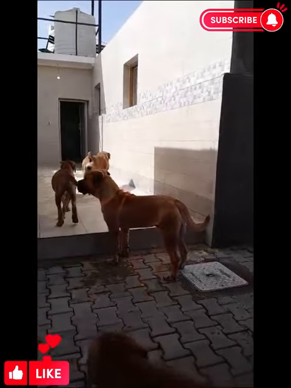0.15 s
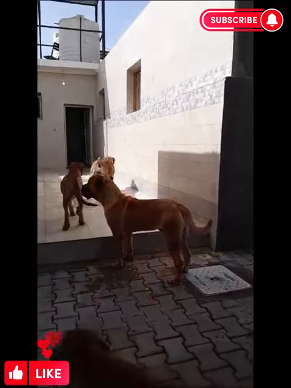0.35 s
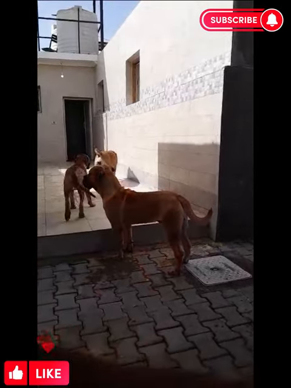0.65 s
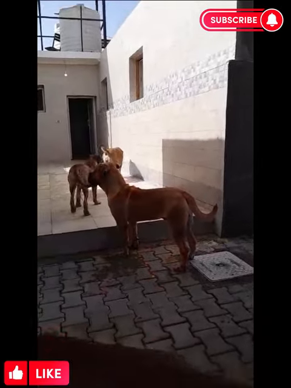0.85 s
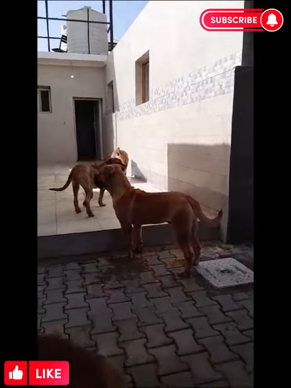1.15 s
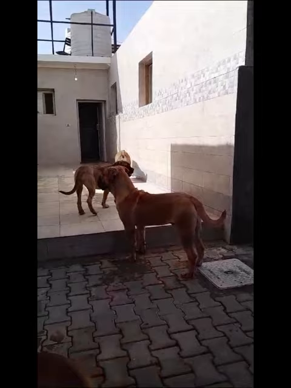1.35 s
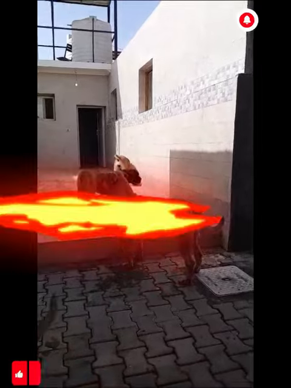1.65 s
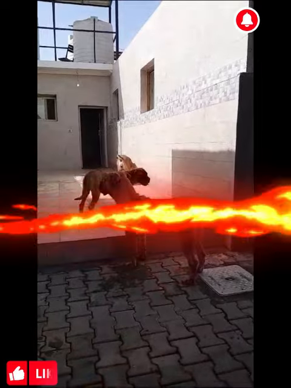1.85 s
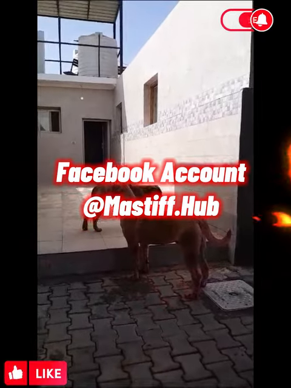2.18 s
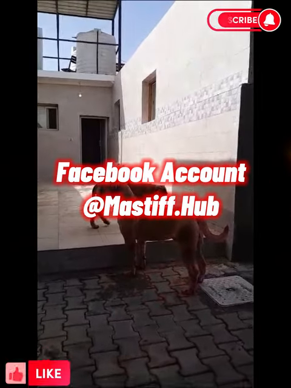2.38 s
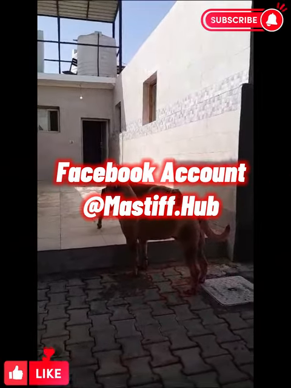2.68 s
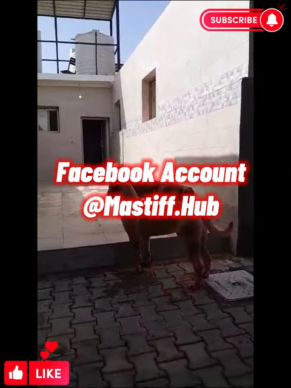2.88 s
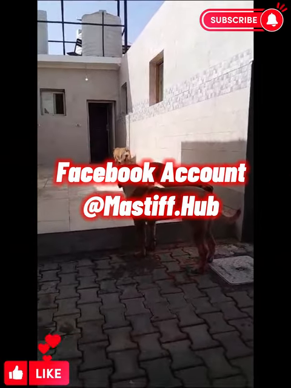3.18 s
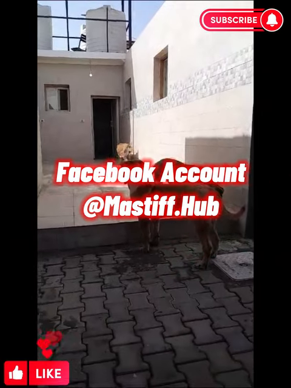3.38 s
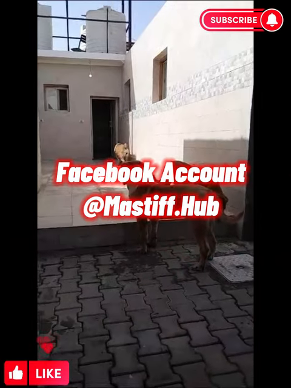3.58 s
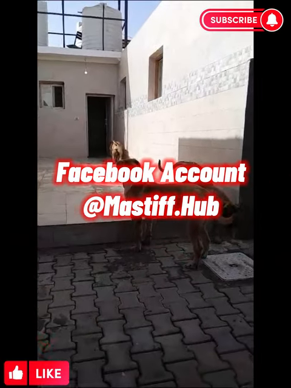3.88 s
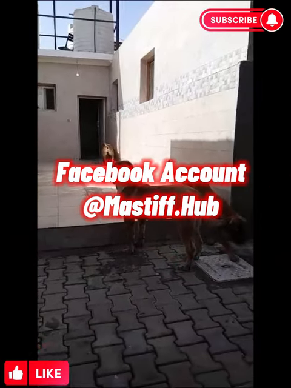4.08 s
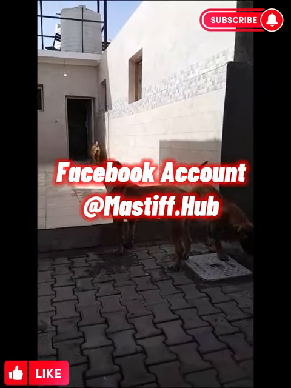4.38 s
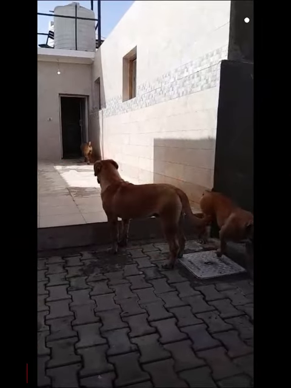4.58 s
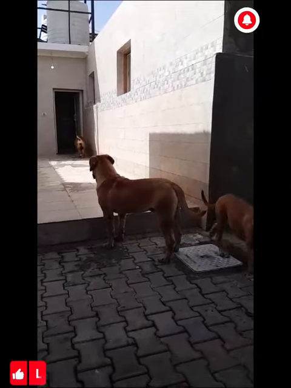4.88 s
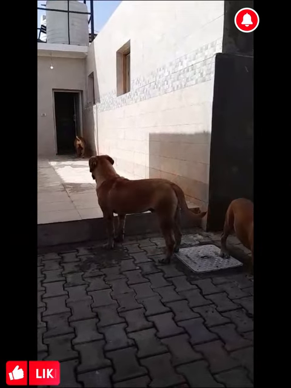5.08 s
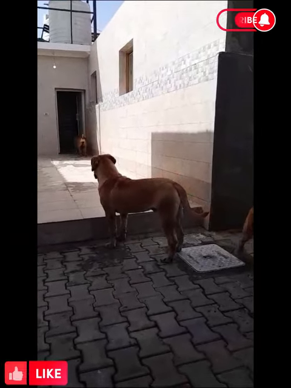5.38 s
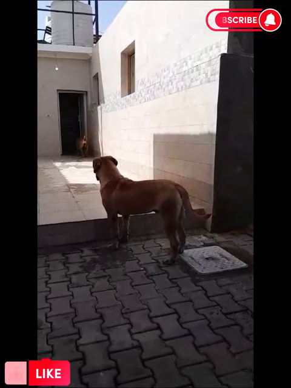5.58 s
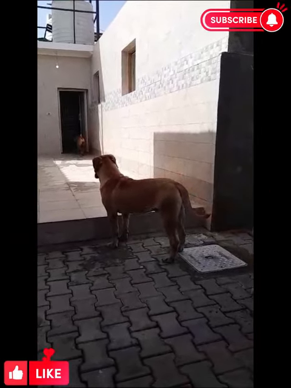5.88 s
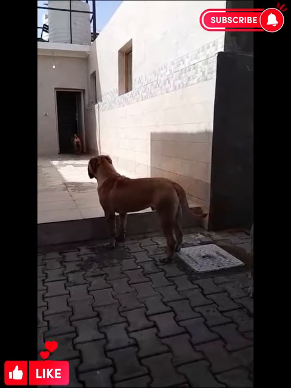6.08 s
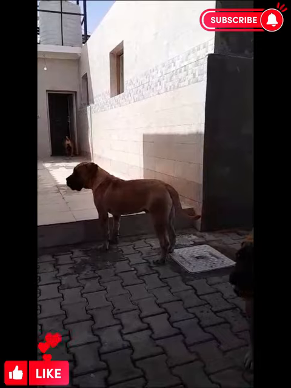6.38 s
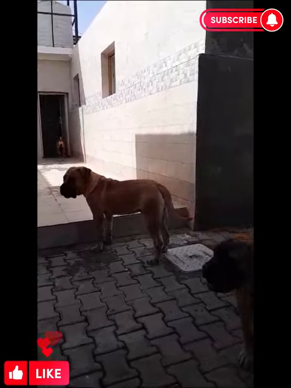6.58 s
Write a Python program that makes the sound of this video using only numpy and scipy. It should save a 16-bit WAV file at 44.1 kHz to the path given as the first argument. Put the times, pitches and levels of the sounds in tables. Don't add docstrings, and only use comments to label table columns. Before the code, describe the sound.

In a paved, walled courtyard, wind bumps low on a handheld phone while paws scuff lightly. A big dog close by gives a deep rough bark, then a weaker one; a distant dog answers twice, higher and reverberant. Fast sniffing grows near the microphone, then the close dog barks loudest, followed by a quick second bark overlapped by the far dog. Walls echo, and faint town hush lingers.

```python
import sys
import numpy as np
from scipy import signal
from scipy.fft import rfft, irfft, next_fast_len
from scipy.io import wavfile
from scipy.ndimage import uniform_filter1d

SR = 44100
rng = np.random.default_rng(int(sys.argv[2]) if len(sys.argv) > 2 else 0)


def log_audio(samples):
    frames = np.atleast_2d(samples).T
    limited = np.clip(frames, -1, 1)
    pcm = np.round(limited * 32767).astype(np.int16)
    wavfile.write(sys.argv[1], SR, pcm)


def level_to_linear(level):
    exponent = np.asarray(level, float) / 20
    return 10 ** exponent


N = 297224

# (peak [s], rise [s], fall [s], peak level [dB], top pitch [Hz])
NEAR_BARKS = [
    (1.727, 0.074, .11, -11.5, 226.9),
    (2.672, 0.09, 0.1, -26, 202.3),
    (5.54, 0.089, .11, -10, 212.6),
    (6.167, .085, .07, -15, 228.8),
    (6.8, 0.09, 0.071, -32, 180),
]
FAR_BARKS = [
    (2.955, .11, 0.12, -19, 321.1),
    (3.697, .105, .13, -22.5, 288.6),
    (6.29, .07, 0.1214, -19, 287.6),
]


def evened(x):
    return x / np.sqrt(np.mean(x ** 2) + 1e-20)


def read(points, hz):
    f, value = np.transpose(points)
    return np.interp(np.log(hz + 1), np.log(f + 1), value)


def add(mix, s, sound):
    part = mix[..., max(round(s * SR), 0):][..., :sound.shape[-1]]
    part += sound[..., :part.shape[-1]]


def drift(count, hz):
    lowpass = signal.butter(2, hz, fs=SR, output="sos")
    return evened(signal.sosfilt(lowpass, rng.standard_normal(count + 4000))[4000:])


def swell(t, s, half):
    return np.exp(-((t - s) / max(half, .002)) ** 2)


def resonate(x, hz, width):
    turn = np.exp(2j * np.pi * np.cumsum(hz * np.ones(x.shape[-1])) / SR)
    r = np.exp(-np.pi * width / SR)
    return 2 * (turn * signal.lfilter([(1 - r) ** 2], [1, -2 * r, r * r], x / turn)).real


def coloured(x, points):
    size = next_fast_len(x.shape[-1])
    gain = level_to_linear(read(points, np.fft.rfftfreq(size, 1 / SR)))
    return irfft(rfft(x, size) * gain, size)[..., :x.shape[-1]]


def sides(db):
    return level_to_linear(np.array([db / 2, -db / 2]))


def perform(row, flutter, vowel, jaw, gesture, rough, full_db):
    peak, rise, fall, db, hz = row
    rasp_db, bright_db, chest_db = flutter
    mouth_ratio, *throat_db = vowel
    stretch_start, stretch_end, fade_db, tilt_db, arch = jaw
    stage, effort_db, ratio, rougher, mouth_hz, more_rasp_db, more_chest_db = np.transpose(gesture)
    rough_per_db = .03
    rows = np.transpose([
        peak + stage * np.where(stage < 0, rise, fall),
        db + effort_db,
        hz * ratio ** arch,
        rough + rougher + rough_per_db * max(full_db - db, 0),
        mouth_hz * mouth_ratio,
        rasp_db + more_rasp_db,
        chest_db + more_chest_db])
    return rows, (stretch_start, stretch_end, bright_db, fade_db, tilt_db, [*throat_db, 0])


def bark(rows, colour, throat, cavities, chest_hz, jitter, weak_db):
    # (time [s], level [dB], half length [s])
    surges = [(1.673, -4, .008), (1.681, 4.5, 0.0043), (1.699, 2.5, 0.0044), (1.723, 4.5, 0.0044),
              (1.737, 3.8, 0.007), (1.762, 6.5, .008), (2.605, -5, 0.0074), (2.61, 6, 0.0062),
              (2.648, 6, 0.0068), (2.704, 0.5, 0.0023), (2.882, -9.5, 0.014), (2.892, 2.5, 0.0057),
              (2.906, 1.5, 0.006), (2.941, 5.5, 0.0098), (2.956, -6, 0.002), (2.986, 2.5, 0.0041),
              (3, 12.5, 0.0094), (3.639, 10, 0.0062), (3.641, -10.5, .004), (3.655, 10, 0.0074),
              (3.663, -9.5, 0.0025), (3.684, 14.5, 0.0041), (3.696, 5, 0.0031), (3.703, 9, 0.0027),
              (3.731, 9, .008), (3.788, 7, 0.017), (5.456, -17, .008), (5.487, -7, 0.012),
              (5.497, 3, 0.0072), (5.528, 3.5, 0.015), (5.535, 2.5, 0.0052), (5.559, -2, 0.0067),
              (6.114, 5, 0.0069), (6.127, -8, 0.014), (6.14, 7.5, 0.0054), (6.154, 2.5, 0.018),
              (6.229, -3, 0.0069), (6.27, 3.5, 0.0034), (6.283, -8, 0.0056), (6.29, 1, 0.0052),
              (6.319, -10.5, 0.0062), (6.33, 9, .008), (6.374, -5, 0.004)]
    # (time [s], half length [s], centre [Hz], width [Hz], level re voice [dB])
    flares = [(1.685, 0.0066, 2202, 300, -15.5), (1.696, 0.015, 4696, 298, -30),
              (1.72, 0.014, 5280, 600, -33.5), (1.744, .028, 2600, 200, -15.5),
              (1.746, .03, 2210, 200, -14.5), (2.626, 0.017, 2300, 250, -14.5),
              (2.697, 0.015, 3020, 606, -10.5), (2.705, .035, 5520, 595, -16.5),
              (2.94, .04, 3400, 200, -46.5), (2.96, 0.024, 4380, 300, -42.5), (3.63, 0.013, 2100, 150, -26),
              (3.679, 0.0096, 1620, 150, -17.5), (3.732, 0.033, 4170, 302, -27),
              (5.484, 0.0078, 2385, 300, -10.5), (5.499, 0.0058, 5160, 500, -22.5),
              (5.537, 0.014, 5570, 500, -23.5), (5.546, 0.012, 4960, 300, -25.5),
              (5.548, 0.012, 2750, 250, -31), (6.13, 0.014, 2720, 250, -24.5),
              (6.118, 0.012, 2040, 250, -11), (6.177, 0.01, 2700, 300, -24), (6.185, 0.017, 3470, 200, -31),
              (6.219, .015, 4580, 500, -14), (6.226, 0.018, 2700, 303, -16)]
    glows = [(1.687, 0.011, 874, 120, -4), (1.79, 0.029, 281, 90, 0), (1.735, 0.023, 664, 100, -6.5),
             (2.679, 0.025, 314, 90, -3), (2.669, 0.042, 778, 90, -10), (2.895, 0.013, 579, 100, 0),
             (2.96, 0.019, 967, 80, -7.5), (2.98, 0.024, 298, 70, -11), (3.78, 0.043, 301, 80, -3),
             (5.478, .015, 186, 80, -3), (5.515, 0.016, 432, 130, -8), (5.57, 0.032, 707, 90, -4),
             (6.165, 0.01, 458, 100, -8.5), (6.29, 0.028, 560, 80, -7.5)]
    breaths = [(1.665, 0.011, 6084, 6000, -17.5), (1.712, 0.018, 5110, 1400, -19),
               (1.78, 0.043, 11000, 7000, -28), (2.74, 0.015, 6000, 5000, -23),
               (5.475, 0.017, 4500, 5000, -20), (5.6, 0.024, 7940, 6000, -34.5)]
    more_glows = [(2.65, .025, 1210, 252, -9), (2.66, 0.022, 1820, 790, -23), (5.535, 0.019, 1074, 248, -9),
                  (5.54, 0.026, 854, 120, -10), (6.16, .015, 875, 120, -6), (6.165, 0.016, 1250, 400, -12),
                  (6.295, 0.027, 930, 150, -15), (6.33, 0.02, 572, 100, -15)]
    s, *columns = np.transpose(rows)
    t = np.arange(s[0], s[-1], 1 / SR)
    effort_db, hz, rough, mouth_hz, rasp_db, chest_db = (np.interp(t, s, c) for c in columns)
    rough = np.clip(rough, 0, 1)
    stretch_start, stretch_end, bright_db, fade_db, tilt_db, throat_db = colour

    turns = np.cumsum(hz * (1 + jitter * drift(len(t), 60))) / SR
    alternate = 1 + level_to_linear(weak_db) * np.cos(np.pi * turns)
    folds = alternate * sum(np.cos(2 * np.pi * k * turns) for k in range(1, 24))
    puffs = (1.0 + np.exp(-(turns % 1) / 0.044)) * rng.standard_normal(len(t))
    drive = np.sqrt(1 - rough) * evened(folds) + 2.3 * np.sqrt(rough) * evened(puffs)

    mouth = mouth_hz / throat[0][0]
    voice = 0
    for k, (f, width, db) in enumerate(throat):
        ring = resonate(drive, f * mouth ** (1 / (1 + 3 * k)), width)
        voice = voice + (-1) ** k * level_to_linear(db + k * bright_db + throat_db[k]) * ring

    stretch = np.linspace(stretch_start, stretch_end, len(t))
    tilt = tilt_db - fade_db * np.linspace(-.5, .5, len(t))
    rasp = 0
    for f, width, db in cavities:
        ring = evened(resonate(drive, f * stretch, max(width, 70)))
        rasp = rasp + level_to_linear(db + tilt * np.log2(f / 2500)) * ring

    surge_db = sum(db * swell(t, at, half) for at, db, half in surges)
    moments = 0
    for at, half, f, width, db in flares + glows + breaths + more_glows:
        if s[0] < at < s[-1]:
            ring = evened(resonate(drive, f, max(width, 70)))
            moments = moments + level_to_linear(db) * swell(t, at, half) * ring

    body = evened(voice) + level_to_linear(chest_db) * evened(resonate(drive, chest_hz, 73))
    whole = level_to_linear(surge_db) * body + level_to_linear(rasp_db + .4 * surge_db) * evened(rasp) + moments
    radiated = signal.sosfilt(signal.butter(2, 120, "high", fs=SR, output="sos"), whole)
    return level_to_linear(effort_db) * radiated * signal.windows.tukey(len(t), .2)


def yard(x, direct_db, echo_db, tail_db, gap):
    # (frequency [Hz], t60 [s])
    decay = [(150, 0.93), (400, 0.77), (1040, 0.93), (2760, 0.4), (7280, 0.74)]
    # (frequency [Hz], level [dB])
    tail_colour = [(120, -6.5), (200, -0.5), (300, 7.5), (700, 2.5), (1200, -3), (2500, 8), (8000, 3.5)]
    # (frequency [Hz], left-right likeness [0-1])
    likeness = [(100, 1), (400, 0.96), (1000, 0.67), (3000, 0.12), (10000, .2)]
    # (delay [s], left [dB], right [dB])
    echoes = [(.004, -9.5, -25.5), (.011, -16.5, -6.5), (.019, 6, -6.5), (.027, -5.5, -4), (.041, -7.5, -1),
              (.058, -8, -19.5)]
    taps = np.zeros((2, SR))
    at = np.arange(0, SR - 20, 20) + rng.integers(0, 20, (2, SR // 20 - 1))
    np.put_along_axis(taps, at, rng.choice([-1., 1.], at.shape), 1)
    hz, t, z = signal.stft(taps, SR, nperseg=256)
    same = np.clip(read(likeness, hz), 0, 1)[:, None]
    z[1] = same * z[0] + np.sqrt(1 - same ** 2) * z[1]
    fall_db = read(tail_colour, hz)[:, None] - 60 * t / read(decay, hz)[:, None]
    tail = signal.istft(z * level_to_linear(fall_db) * np.minimum(t / gap, 1), SR, nperseg=256)[1][:, :SR]
    paths = level_to_linear(tail_db) * tail / np.linalg.norm(tail[0])
    paths[1, 10] += level_to_linear(direct_db)
    paths[0, 0] += level_to_linear(direct_db)
    for k, (delay, left_db, right_db) in enumerate(echoes):
        start = round(delay * SR)
        paths[0, start] += level_to_linear(left_db + echo_db)
        paths[1, start + (-1) ** k * 14] += level_to_linear(right_db + echo_db)
    return signal.fftconvolve(x[None], paths, axes=1)[:, :N]


def dogs():
    # (centre [Hz], width [Hz], level [dB])
    near_throat = [(464, 282, 9), (711, 156, 5.5), (926, 134, -6.5), (1146, 198, -2.5), (1550, 740, -17.5)]
    near_rasp = [(2280, 87, 7), (2676, 180, 9), (3150, 1500, -6), (4620, 240, -3.5), (5820, 1100, 6),
                 (7070, 1600, -9.5), (11400, 3500, -9), (13070, 7900, -9)]
    far_throat = [(560, 172, 9.5), (834, 140, -12.5), (958.4, 93, -4.5), (1390, 300, -32)]
    far_rasp = [(1720, 110, 8), (2230, 150, -7), (3380, 130, -5), (4210, 170, -9)]
    # (stage [-1 onset, 0 peak, 1 end], effort [dB], pitch [ratio],
    # added roughness [0-1], mouth [Hz], rasp [dB], chest [dB])
    near_gesture = [(-1, -37, .82, 0.079, 385, -7, 24), (-.72, -17, .88, 0.72, 410, 0, 24),
                    (-.55, -5, 0.93, 0.18, 383, -1, 5.5), (0, -2.5, 0.97, 0.33, 517, -1.3, -5.3),
                    (.28, -8.5, .87, 0.21, 351, 0.5, -4.5), (.6, -15.5, .75, 0.16, 374, -4.5, 2.5),
                    (1, -15.5, 0.61, .12, 275, -4, 10.5)]
    far_gesture = [(-1, -32, .92, 0.12, 430, -2.5, 0), (-.7, -6.5, .94, 0.25, 603, 1, 2),
                   (-.4, -4.5, .96, 0.067, 531, 6, -6), (0, -0.6, .99, 0.012, 556, 4.5, 0.5),
                   (0.243, -12.5, 1.04, .02, 573, 6, 9.5), (0.53, -18, .98, 0.18, 590, -12.5, 12.5),
                   (0.77, -21, 0.83, 0.45, 470, -16, -2)]
    # (rasp [dB], brightness per resonance [dB], chest [dB])
    near_flutter = [(-20, 1.33, -27), (-18.5, 1.5, -5), (-20, 0.93, -24), (-21.5, 1.4, -15),
                    (-54, 18, -11.5)]
    far_flutter = [(-30, 2.5, -5.5), (-40, -1, -6.5), (-30, 0.1, -8)]
    # (mouth opening [ratio], first four throat resonances, each [dB])
    near_vowels = [(0.98, -0.68, 5, 1.8, 2.2), (0.67, 0.96, -2.7, 0.5, -4.5), (0.97, 0.19, 4, 4.4, 4.5),
                   (1.014, 1, -2.8, 3.2, -4.5), (0.66, .1, .1, .1, -3)]
    far_vowels = [(0.97, -0.92, 1.5, -9, .1), (0.92, .6, 4.6, .1, .1), (1.008, 0.035, .1, 0.21, .1)]
    # (cavity stretch at onset [ratio], at end [ratio], treble lost [dB/octave],
    # treble tilt [dB/octave], pitch arch depth [exponent])
    near_jaws = [(0.97, 1.01, 18.5, -4, .9), (0.97, 1.155, -11.5, 4, 1.2), (0.92, 1.076, 13, -1, 1.1),
                 (0.97, 1.06, -1, 3, 1.3), (.85, 1.1, -20, .1, 1.7)]
    far_jaws = [(.98, 1.01, 6, -7.5, 1.1), (0.99, 1.01, -5, -14, 1.1), (0.92, 1.014, 10.5, 1.5, 1.2)]
    near, far = np.zeros((2, N))
    for row in zip(NEAR_BARKS, near_flutter, near_vowels, near_jaws):
        rows, colour = perform(*row, near_gesture, rough=.1, full_db=-11)
        add(near, rows[0][0], bark(rows, colour, near_throat, near_rasp, 195, jitter=.045, weak_db=-9))
    for row in zip(FAR_BARKS, far_flutter, far_vowels, far_jaws):
        rows, colour = perform(*row, far_gesture, rough=.36, full_db=-17)
        add(far, rows[0][0], bark(rows, colour, far_throat, far_rasp, 320, jitter=.055, weak_db=-6))
    return yard(near, 0.21, -8, -6.5, gap=0.0025) + yard(far, 0.64, -32.5, -2.02, gap=0.027)


def grunts():
    # (time [s], level [dB], centre [Hz], half length [s])
    rumbles = [
        (1.66, -55, 1100, .01),
        (6.015, -43, 170, .02),
        (6.06, -48, 200, .03),
    ]
    out, t = np.zeros(N), np.arange(SR // 5) / SR
    for s, db, hz, half in rumbles:
        rumble = evened(resonate(rng.standard_normal(len(t)), hz, .8 * hz))
        add(out, s - .1, level_to_linear(db) * swell(t, .1, half) * rumble)
    return out


def paws():
    # (time [s], peak level [dB], left-right [dB], grit below 5 kHz [dB])
    scuffs = [(0.281, -52, 14, 0), (.422, -51, 11, 6.5), (.826, -49.5, 9, -1.5), (0.9, -54, 17, 5.5),
              (1.119, -51.5, 26.5, -3), (1.423, -58.5, 33, 11.5), (1.494, -48, 14, -19),
              (2.005, -55, 26, -25), (2.176, -52.5, 16, -23), (2.435, -57, 23.5, 0),
              (2.462, -48.5, 15, -0.5), (3.206, -42.5, 19, -8.5), (3.361, -47, 27, -10),
              (3.74, -52.5, 9, -1), (4.053, -59.5, -3, 10), (4.409, -52.5, 8, -31), (4.526, -47.5, 7.5, 0),
              (4.726, -55.5, 31, 18), (6.501, -41, 13, 0), (6.619, -48, 1, -2)]
    drags = [0.016, 0.048, .012, .06, 0.028, .07, .013, 0.012, 0.019, .03, 0.057, 0.022, 0.031, 0.039,
             0.085, 0.022, 0.024, 0.014, 0.024, 0.024]
    # (time [s], peak level [dB], left-right [dB], grit below 5 kHz [dB])
    pad_taps = [(0.039, -49, 13, -3), (0.63, -49.5, 25, 1.5), (3.526, -54, 19, -37), (3.911, -52, -2, 2),
                (4.259, -55, 3.5, -13), (5.297, -38, 11, -5), (5.672, -42.5, 18, -32),
                (5.801, -57.5, 8, 19.5)]
    scuff_t60_s, tap_t60_s, tap_s, grit_linger = 0.17, 0.054, 0.014, 0.12
    contacts = [(*row, drag, scuff_t60_s) for row, drag in zip(scuffs, drags)]
    contacts += [(*row, tap_s, tap_t60_s) for row in pad_taps]
    out, t = np.zeros((2, N)), np.arange(SR // 4) / SR
    for s, db, pan_db, grit_db, drag_s, t60_s in contacts:
        linger_s = t60_s * level_to_linear(grit_linger * grit_db)
        shape = np.minimum(t / 0.0044, 1) * level_to_linear(-60 * np.maximum(t - drag_s, 0) / linger_s)
        noise = rng.standard_normal((2, len(t))) * level_to_linear(1.8 * drift(len(t), 150))
        hiss = evened(resonate(noise, 14000, 8400)) * sides(pan_db * 0.77)[:, None]
        grit = evened(resonate(noise, 4400, 3800))
        add(out, s, level_to_linear(db - 12.0) * shape * (hiss + level_to_linear(grit_db) * grit))
    return out


def nose():
    # (time [s], peak level [dB], nostril [Hz])
    sniffs = [(3.419, -66.5, 4600), (3.475, -60, 5170), (3.595, -60.5, 5440), (3.6536, -57.5, 4420),
              (3.72, -57, 4170), (3.7877, -60, 4900), (3.8542, -55, 4770), (3.914, -57, 4940),
              (3.983, -55.5, 5170), (4.053, -57, 5260), (4.14, -54.5, 5200), (4.211, -54, 5380),
              (4.27, -55.5, 4700), (4.3402, -56.5, 4600), (4.4143, -54.5, 5170), (4.4826, -56, 5490),
              (4.555, -53, 5030), (4.637, -50.5, 5350), (4.7061, -50.5, 5300), (4.782, -50, 5300),
              (4.8458, -50.5, 5040), (4.924, -52, 5500), (4.994, -49, 5670), (5.0739, -49, 5360),
              (5.1494, -48.5, 5830), (5.234, -48.5, 5640), (5.315, -48.5, 5700), (5.3815, -47, 5570),
              (5.452, -46.5, 5560), (5.638, -48, 5100), (5.712, -47, 5800), (5.7922, -47, 5450),
              (5.877, -47, 5240), (5.971, -49.5, 5500), (6.049, -58.5, 4500), (6.339, -55, 5800),
              (6.4194, -82, 4060), (6.5718, -56, 5800)]
    # (time [s], level [dB], mouth [Hz], nose [Hz], length [s])
    huffs = [(0, -55, 540, 1920, .033), (.642, -68, 820, 3250, .11), (.897, -67.5, 610, 2480, .082),
             (1.206, -56.5, 836, 2530, .092), (1.6, -66, 5300, 4300, .065), (3.24, -58, 1000, 1800, .04),
             (4.714, -53, 240, 1970, .069), (4.764, -54, 1030, 2870, .035), (4.86, -64, 1050, 2670, .17),
             (5.08, -64, 900, 2600, .07), (5.149, -62, 950, 2300, .07), (5.24, -59, 1050, 2200, .1),
             (5.972, -52, 170, 1890, .039), (6.673, -53, 980, 2050, .06)]
    out, t = np.zeros((2, N)), np.arange(SR // 8) / SR
    shape = np.minimum(t / 0.0033, 1) * level_to_linear(-60 * np.maximum(t - .02, 0) / 0.18)
    for s, db, hz in sniffs:
        breath = rng.standard_normal((2, len(t)))
        nostril = evened(resonate(breath, hz * (1.04 - 2.8 * t), 1300))
        sinus_db = -6.5 + 0.95 * (db + 49.0)
        sinus = level_to_linear(sinus_db) * evened(resonate(breath, 0.63 * hz, 2000))
        sniff = nostril + sinus + level_to_linear(-10) * breath
        add(out, s, level_to_linear(db - 1.5) * shape * sniff * sides(0.41)[:, None])
    for s, db, mouth_hz, nose_hz, length_s in huffs:
        breath = rng.standard_normal((2, round(1.3 * length_s * SR)))
        pant = evened(resonate(breath, mouth_hz, max(400, mouth_hz / 4)))
        pant = pant + level_to_linear(-5) * evened(resonate(breath, nose_hz, 1600))
        add(out, s, level_to_linear(db) * pant * signal.windows.tukey(breath.shape[1], .4))
    return out


def gate():
    # (time [s], level [dB], note [Hz], t60 [s])
    rings = [
        (5.561, -59, 1662, 3),
        (6.197, -63, 1650, 2.6),
    ]
    out, t = np.zeros(N), np.arange(SR) / SR
    for s, db, hz, t60_s in rings:
        add(out, s, np.minimum(t / 0.022, 1) * level_to_linear(db - 60 * t / t60_s) * np.sin(2 * np.pi * hz * t))
    return out


def wind():
    # (time [s], peak level [dB], left-right [dB], half length [s])
    gusts = [(0.015, -43, 12, 0.3), (0.196, -34.5, 4.5, 0.096), (0.436, -23.5, 33, 0.058),
             (0.922, -37.5, -5, 0.068), (1.1, -36, -16, 0.076), (1.197, -40.5, 0.5, 0.1),
             (1.457, -38, 19, 0.048), (1.71, -46, 8, 0.091), (1.881, -38.5, 10, 0.042),
             (2.015, -35, 31, 0.068), (2.232, -37, 36, 0.05), (2.509, -37.5, 4, 0.078),
             (2.624, -33.5, 14.5, 0.1), (2.955, -30.5, 38, 0.042), (3.143, -23, -25, 0.044),
             (3.243, -28, -4, 0.075), (3.497, -42, 26, 0.14), (3.746, -43, 4, 0.19),
             (4.156, -43.5, -7, 0.045), (4.638, -40, 30, 0.058), (5.069, -36.5, 18, 0.079),
             (5.293, -38.5, 3.5, 0.36), (5.49, -36.5, -19, 0.12), (5.608, -35.5, 10, 0.04),
             (5.872, -37, -32, 0.027), (6.133, -41, -4, 0.17), (6.296, -48.5, 22, 0.24),
             (6.39, -38.5, -21, 0.037), (6.712, -43.5, -29, 0.12), (.315, -32, 9, 0.031)]
    # (frequency [Hz], density [dB/Hz])
    wind_colour = [(22, -22.5), (53, 1.5), (80, -0.1), (113, -6), (140, -18), (216, -24.5), (500, -49),
                   (900, -90.5)]
    lull_db, gust_edge = -63.5, 1.35
    t, power = np.arange(N // 64 + 2) * 64 / SR, level_to_linear(2 * lull_db)
    for s, db, pan_db, half in gusts:
        lean = sides(pan_db)[:, None]
        gust_db = db - 8.2 * abs((t - s) / max(half, .02)) ** gust_edge
        power = power + level_to_linear(2 * gust_db) * lean ** 2 / np.mean(lean ** 2)
    level = np.array([np.interp(np.arange(N) / SR, t, port) for port in np.sqrt(power)])
    lumps = level_to_linear(1.6 * np.array([drift(N, 13), drift(N, 6.7)]))
    rumble = coloured(rng.standard_normal((2, N)), wind_colour)
    return level_to_linear(0.5) * level * evened(lumps * rumble)


def town_hush():
    # (frequency [Hz], density [dB/Hz])
    air_colour = [(88, -33.5), (150, 5.5), (450, -5), (837, -3.5), (1700, -16.5), (4000, -11),
                  (5570, -20.5), (16000, -25.5)]
    hush_db, stir_db, stir_t60_s = -71, -45.5, 0.67
    hz, t, z = signal.stft(coloured(rng.standard_normal((2, N)), air_colour), SR, nperseg=512)
    patches = uniform_filter1d(rng.standard_normal(z.shape[1:]), 30, 0)
    patches = evened(uniform_filter1d(patches, 12, 1))
    hush = signal.istft(z * level_to_linear(3 * patches), SR, nperseg=512)[1][:, :N]
    now, level = np.arange(N) / SR, level_to_linear(hush_db)
    for s, rise, fall, db, hz in NEAR_BARKS + FAR_BARKS:
        onset = np.clip((now - s) / rise + 1, 0, 1)
        level = level + onset * level_to_linear(db + stir_db - 60 * np.maximum(now - s, 0) / stir_t60_s)
    return level_to_linear(8.0) * level * evened(hush)


def scene():
    small = paws() + nose()
    small_yard = level_to_linear(-7.0) * yard(small.mean(0), -48, -6.0, 2.5, gap=0.041)
    return dogs() + grunts() + small + small_yard + gate() + wind() + town_hush()


def top_cut(x):
    return signal.sosfilt(signal.butter(12, 16480, fs=SR, output="sos"), x)


def record(dry):
    # (frequency [Hz], left-right [dB])
    port_colour = [(80, 3), (200, -0.5), (380, 2), (700, -0.8), (1500, 4), (4400, -6), (8120, 12),
                   (15000, -0.5)]
    left = [(hz, db / 2) for hz, db in port_colour]
    right = [(hz, -db / 2) for hz, db in port_colour]
    ports = np.array([coloured(dry[0], left), coloured(dry[1], right)])
    ports = signal.sosfilt(signal.butter(2, 45, "high", fs=SR, output="sos"), ports)
    rounded = 1.05 * np.tanh(ports / 1.05)
    lowpass = signal.firwin(511, 15750, window=("kaiser", 9), fs=SR)
    limited = signal.oaconvolve(rounded, lowpass[None], "same")
    return top_cut(limited)


dry = scene()
out = record(dry)
log_audio(out)
```